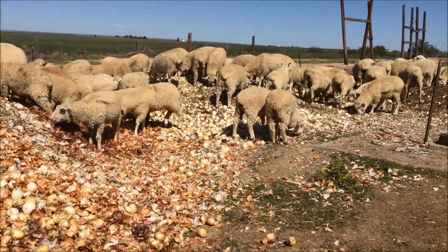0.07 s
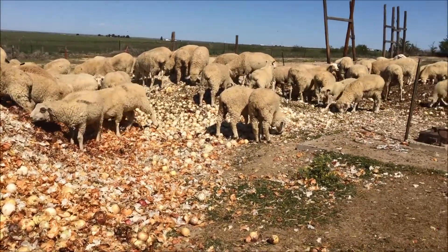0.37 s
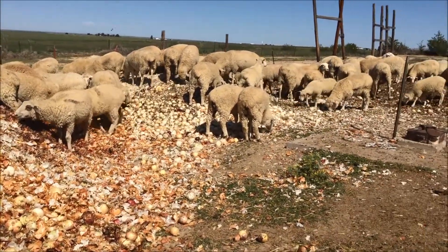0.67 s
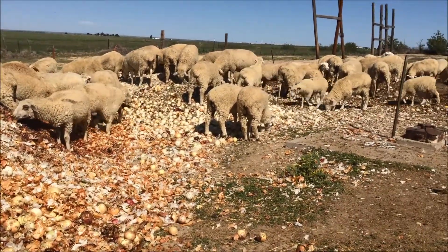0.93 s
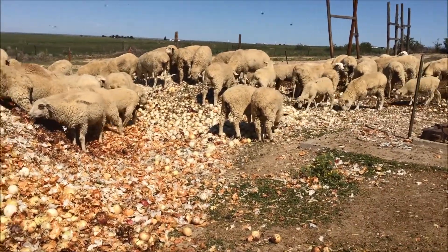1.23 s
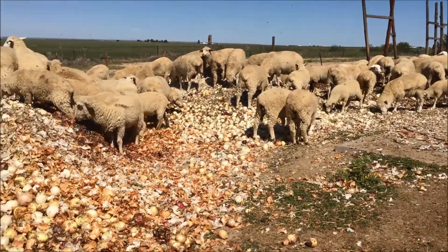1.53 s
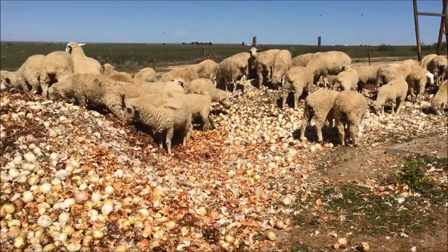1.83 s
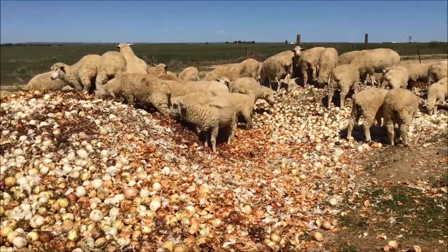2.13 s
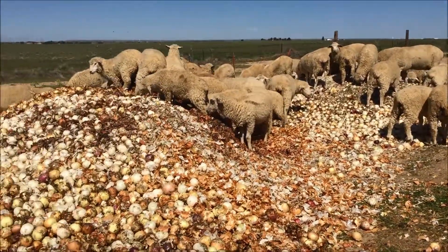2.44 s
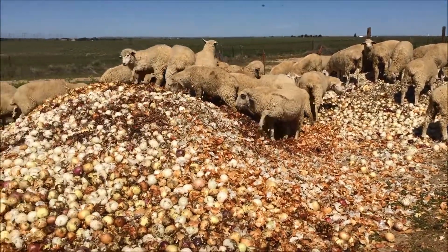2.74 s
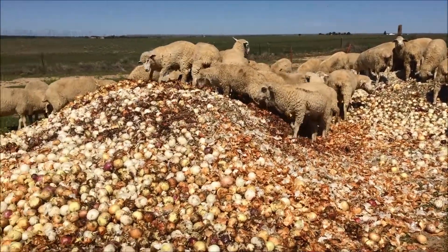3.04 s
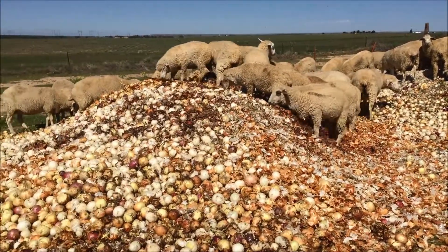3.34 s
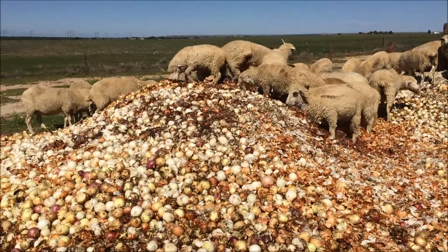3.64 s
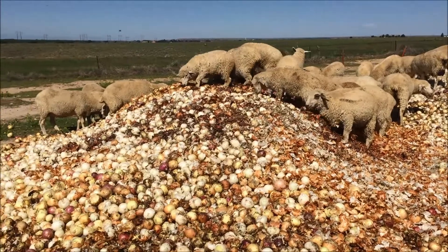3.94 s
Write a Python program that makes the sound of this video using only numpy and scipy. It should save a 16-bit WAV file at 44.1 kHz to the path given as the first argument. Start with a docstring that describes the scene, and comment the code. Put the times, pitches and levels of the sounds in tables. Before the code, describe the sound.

Wind buffets the microphone in gusts, and a sheep gives one long bleat.

```python
"""Sheep in a windy field.

Gusts sweep eddies over the microphone port: the faster the air, the louder and brighter the blast.
A low rumble stays between gusts, over distant air and a faint dry rustle that swells and fades.
A sheep gives one long bleat, quavering, then held: vocal fold pulses ring its throat
as the mouth opens and closes."""
import sys
import numpy as np
from scipy import signal
from scipy.fft import rfft, irfft
from scipy.io import wavfile
from scipy.ndimage import map_coordinates

SR = 44100
rng = np.random.default_rng(int(sys.argv[2]) if len(sys.argv) > 2 else 0)


def inscribe(sig):
    """Save sig as 16-bit PCM at rate SR to the path in sys.argv[1].

    A 1-D sig is mono; a 2-D sig holds one channel per row.
    Samples are clipped to [-1, 1] before scaling.
    """
    pcm = np.round(np.clip(np.atleast_2d(sig).T, -1, 1) * 32767)
    wavfile.write(sys.argv[1], SR, pcm.astype(np.int16))


N = 176400
TIME_S = np.arange(N) / SR
FREQ_HZ = np.fft.rfftfreq(N, 1 / SR)


def amp(db):
    """Decibels to gain."""
    return 10 ** (np.asarray(db) / 20)


def unit(x):
    """Scale to rms 1."""
    return x / np.sqrt(np.mean(x ** 2) + 1e-20)


def curve(rows, column=1):
    """One column of a time table, per sample."""
    rows = np.array(rows)
    return np.interp(TIME_S, rows[:, 0], rows[:, column])


def spectrum_gain(spectrum, hz):
    """Gain of a spectrum table at hz."""
    points_hz, db = np.transpose(spectrum)
    return amp(np.interp(np.log(hz + 1), np.log(points_hz), db))


def tint(x, spectrum):
    """Filter by a spectrum table, rms 1."""
    return unit(irfft(rfft(x) * spectrum_gain(spectrum, FREQ_HZ), N))


def lowpass(x, hz, order=4):
    """Zero-phase low-pass."""
    return irfft(rfft(x) / (1 + (FREQ_HZ / hz) ** order), N)


def bandpass(x, low_hz, high_hz):
    """Gentle band-pass."""
    return signal.sosfilt(signal.butter(2, [low_hz, high_hz], "band", fs=SR, output="sos"), x)


def wander(hz):
    """Random motion up to hz, rms 1."""
    return unit(lowpass(rng.standard_normal(N), hz))


def swell(start_s, hold_s, rise_s, fall_s):
    """Flat hold with exponential edges."""
    return np.exp(np.minimum(TIME_S - start_s, 0) / rise_s
                  - np.maximum(TIME_S - start_s - hold_s, 0) / fall_s)


# Gusts at the port (start [s], hold [s], strength [dB], thump [dB])
WIND_GUSTS = [(0, .015, -21, -18.5), (0.051, 0.031, -32, -28), (0.128, .055, -15, -15),
              (0.259, 0.027, -29, -32.5), (0.296, 0.035, -13, -15.5), (0.344, 0.099, -25, -21),
              (0.481, 0.014, -25, -29), (0.521, 0.0098, -21.5, -21), (.594, .068, -14, -15),
              (0.674, 0.092, -21.5, -26), (0.771, .11, -15, -39), (0.887, 0.04, -15, -18),
              (0.951, 0.093, -34, -30), (1.06, 0.039, -23, -37), (1.14, 0.034, -32, -32),
              (1.3, 0.086, -31, -21.5), (1.39, 0.13, -26, -21), (1.408, .003, -16, -37),
              (1.563, 0.043, -24, -19.5), (1.893, .055, -35, -20), (1.982, 0.044, -31.5, -17),
              (2.102, 0.02006, -30, -27), (2.176, 0.043, -38, -16.5), (2.394, .06, -27, -14),
              (2.412, 0.00372, -18, -25), (2.513, 0.0092, -25.5, -21), (2.575, 0.046, -24, -20),
              (2.593, 0.0045, -12.5, -15), (2.66, 0.019, -25, -14), (2.745, 0.033, -47.5, -30.5)]
# Breeze between gusts (time [s], strength [dB])
BREEZE_STRENGTH = [(0, -44), (1.3, -42), (1.7, -53), (2.5, -51), (2.9, -60)]
# Eddies at the reference strength (frequency [Hz], density [dB])
EDDY_SPECTRUM = [(20, 5), (70, 0), (250, 4), (480, 2), (750, -6.5), (1050, -16), (1500, -31.5), (2200, -47),
                 (3000, -68.5), (8000, -100)]


def gusts(reference_db=-20, flutter_db=4, eddy_db=-18):
    """A frozen eddy pattern passes the port at air speed: faster is louder and brighter."""
    speed_db_per_db, pressure_db_per_db = .36, .32
    strength = amp(curve(BREEZE_STRENGTH))
    for start_s, hold_s, db, _ in WIND_GUSTS:
        strength = np.maximum(strength, amp(db) * swell(start_s, hold_s, rise_s=.005, fall_s=.009))
    gust_db = 20 * np.log10(strength) - reference_db + flutter_db * wander(hz=222.4)
    travel = np.cumsum(amp(speed_db_per_db * gust_db))
    eddies = tint(rng.standard_normal(N), EDDY_SPECTRUM)
    pressure = map_coordinates(eddies, [travel], order=3, mode="wrap")
    return pressure * amp(eddy_db + pressure_db_per_db * gust_db)


# Steady rumble and gust thumps (frequency [Hz], density [dB])
RUMBLE_SPECTRUM = [(25, -32), (60, -1), (170, -5), (250, -16), (700, -79)]
THUMP_SPECTRUM = [(20, -16), (50, 4), (85, 2.5), (200, -5.5), (350, -24.5), (800, -76.5)]


def rumble(steady_db=-34):
    """Large slow eddies rumble steadily and thump the port with each gust."""
    push = sum(amp(db) * swell(start_s, hold_s, rise_s=.01, fall_s=.01)
               for start_s, hold_s, _, db in WIND_GUSTS)
    steady = amp(steady_db) * tint(rng.standard_normal(N), RUMBLE_SPECTRUM)
    thumps = push * tint(rng.standard_normal(N), THUMP_SPECTRUM)
    return steady + thumps


# Rustle envelope (time [s], level [dB])
RUSTLE_SWELLS = [(0.0, -51), (0.05, -66), (0.14, -65.5), (0.45, -54.5), (0.59, -70.5), (0.61, -55),
                 (0.81, -51.5), (0.84, -63.5), (1.31, -53.5), (1.39, -63), (1.61, -45.5), (1.76, -60.5),
                 (2.33, -61.5), (2.44, -62.5), (2.71, -68.5), (2.84, -56), (2.99, -62.5), (3.06, -57),
                 (3.17, -60.5), (3.36, -48.5), (3.55, -59.5), (3.84, -58), (3.93, -53), (3.99, -54.5)]
# Rustle colour (frequency [Hz], density [dB])
RUSTLE_SPECTRUM = [(300, -1.5), (1900, -0.5), (2800, -3), (3800, 2.5), (5200, -1), (9000, 0), (10200, -6),
                   (11500, -4.5), (15700, -11.5)]
# Crisp snaps (start [s], level [dB], centre [Hz], decay [s])
RUSTLE_SNAPS = [(.617, -45, 5000, 0.0095), (2.335, -47, 7940, .004), (3.234, -48, 3873, 0.014),
                (3.357, -40, 9990, 0.0051), (3.599, -46, 3890, 0.017)]


def rustle(trim_db=-1, crackles_per_s=310, crackle_db=-9, spread_db=4, flicker_db=2.5):
    """Dry hiss and crackle swell, body and treble flickering separately, with a few snaps."""
    clicks = (rng.random(N) < crackles_per_s / SR) * rng.choice([-1, 1], N)
    crackle = unit(clicks * amp(spread_db * np.minimum(rng.exponential(1, N), 4)))
    hiss = tint(rng.standard_normal(N) + amp(crackle_db) * crackle, RUSTLE_SPECTRUM)
    body = lowpass(hiss, hz=5000)
    out = sum(part * amp(flicker_db * wander(hz=29.7)) for part in (body, hiss - body))
    out *= amp(trim_db + curve(RUSTLE_SWELLS))
    for start_s, db, hz, decay_s in RUSTLE_SNAPS:
        burst = unit(bandpass(rng.standard_normal(N), hz * .69, hz * 1.44))
        out += amp(db) * burst * (TIME_S >= start_s) * np.exp(-abs(TIME_S - start_s) / decay_s)
    return out


# Distant air (frequency [Hz], density [dB])
AIR_SPECTRUM = [(600, 4.5), (800, -8.5), (2200, -15.5), (15000, -52.5)]


def distant_air(level_db=-52):
    """Steady wash of air over the field."""
    return amp(level_db) * tint(rng.standard_normal(N), AIR_SPECTRUM)


# Bleat contour (time [s], pitch [Hz], effort [dB])
BLEAT_CONTOUR = [(2.1, 158.2, -44), (2.112, 177.1, -42), (2.138, 172.8, -39.5), (2.152, 144, -51),
                 (2.175, 146, -44.5), (2.2, 164.7, -44), (2.222, 174.1, -38.5), (2.238, 159, -49),
                 (2.255, 165.9, -41.5), (2.292, 179.7, -37), (2.312, 165.1, -44), (2.352, 180.7, -40),
                 (2.38, 175.1, -42), (2.43, 180, -44.5), (2.57, 177, -43.5), (2.625, 170, -49),
                 (2.66, 172.3, -51.5), (2.69, 170.2, -52), (2.75, 168.6, -47.5), (2.775, 162, -49.5),
                 (2.81, 169.1, -49.5), (2.92, 170.7, -51.5), (2.96, 159.4, -50), (2.995, 149.1, -49.5)]
# Throat with the mouth opening, wide open, closing (frequency [Hz], gain [dB])
FORMANTS_OPENING = [(170, -8), (600, 5), (1000, -14), (1500, -9.5), (1950, 7.5), (2600, -17), (3100, -14),
                    (5000, -51)]
FORMANTS_OPEN = [(350, -14), (650, 6), (1000, -17), (1450, -9), (1780, -7.5), (1980, 6), (2330, -1),
                 (2650, -10.5), (3150, -6), (3500, -19.5), (4400, -18), (5000, -32), (6300, -38),
                 (6900, -15.5), (7700, -44), (11000, -45)]
FORMANTS_CLOSING = [(350, -2), (510, 12.5), (680, 15), (860, -0.5), (1190, -0.5), (1380, -13), (1750, -1),
                    (2050, 0.5), (2540, 7.5), (2750, -8), (3150, -1), (5000, -27), (6300, -43), (7000, -10),
                    (8000, -46)]


def sheep(trim_db=-.5, shimmer_db=1.2, treble_db_per_db=.39, attack_s=.0061, release_s=.045):
    """Fold pulses ring the throat through three mouth shapes; effort brightens the bleat."""
    open_s, close_s, move_s = 2.16, 2.61, .05
    drive = vocal_folds(curve(BLEAT_CONTOUR))
    opened, closed = (np.clip((TIME_S - s) / move_s + .5, 0, 1) for s in (open_s, close_s))
    voice = ((1 - opened) * throat(drive, FORMANTS_OPENING)
             + (opened - closed) * throat(drive, FORMANTS_OPEN)
             + closed * throat(drive, FORMANTS_CLOSING))
    times_s, _, efforts_db = np.transpose(BLEAT_CONTOUR)
    effort_db = curve(BLEAT_CONTOUR, column=2) + shimmer_db * wander(hz=40)
    body = lowpass(voice, hz=3200, order=8)
    treble = (voice - body) * amp(treble_db_per_db * (effort_db - efforts_db.mean()))
    fade_in = (TIME_S - times_s[0]) / attack_s
    fade_out = (times_s[-1] - TIME_S) / release_s + .5
    gate = np.clip(np.minimum(fade_in, fade_out), 0, 1)
    return (body + treble) * gate * amp(trim_db + effort_db)


def vocal_folds(pitch_hz, harmonics=69, jitter=.006, rasp_db=-17):
    """Sharp pulses, each with a decaying puff of rasp."""
    phase = (np.cumsum(pitch_hz * (1 + jitter * wander(hz=84.46))) / SR) % 1
    pulses = unit(sum(np.cos(2 * np.pi * k * phase) for k in range(1, harmonics + 1)))
    rasp = unit((.3 + np.exp(-phase / .25)) * rng.standard_normal(N))
    return pulses + amp(rasp_db) * rasp


def throat(drive, formants, size=4096):
    """Minimum-phase throat resonances, scaled to rms 1 in the bright band."""
    log_gain = np.log(spectrum_gain(formants, abs(np.fft.fftfreq(size, 1 / SR))))
    impulse = np.fft.ifft(np.exp(np.conj(signal.hilbert(log_gain)))).real
    voice = signal.oaconvolve(drive, impulse[:size // 2])[:N]
    return voice / np.std(bandpass(voice, low_hz=1700, high_hz=4500))


def reflections(x, level_db=-16, t60_s=.13, delay_s=.003):
    """Faint dying scatter from the ground and the flock."""
    t = TIME_S[:SR // 2]
    tail = rng.standard_normal(len(t)) * amp(-60 * t / t60_s) * (t > delay_s)
    return amp(level_db) * signal.oaconvolve(x, tail / np.linalg.norm(tail))[:N]


def scene(wind_ceiling=1.4, fade_in_s=.003):
    """Wind softly overloads the microphone, over the field and the sheep; mono."""
    bleat = sheep()
    air = distant_air()
    wind = wind_ceiling * np.tanh((gusts() + rumble()) / wind_ceiling)
    wind *= np.minimum(TIME_S / fade_in_s, 1)
    return (wind + rustle() + air + bleat + reflections(bleat))[None]


def record(dry):
    """The recorder cuts the deepest bass and the top treble."""
    low_hz, high_hz = 40, 15700
    bass_cut = signal.butter(3, low_hz, "high", fs=SR, output="sos")
    treble_cut = signal.firwin(511, high_hz, window=("kaiser", 9), fs=SR)
    return signal.oaconvolve(signal.sosfilt(bass_cut, dry), treble_cut[None], "same")


dry = scene()
out = record(dry)
inscribe(out)
```